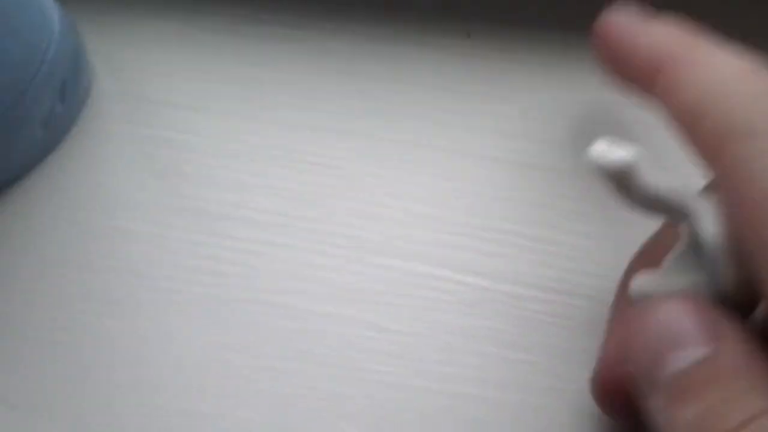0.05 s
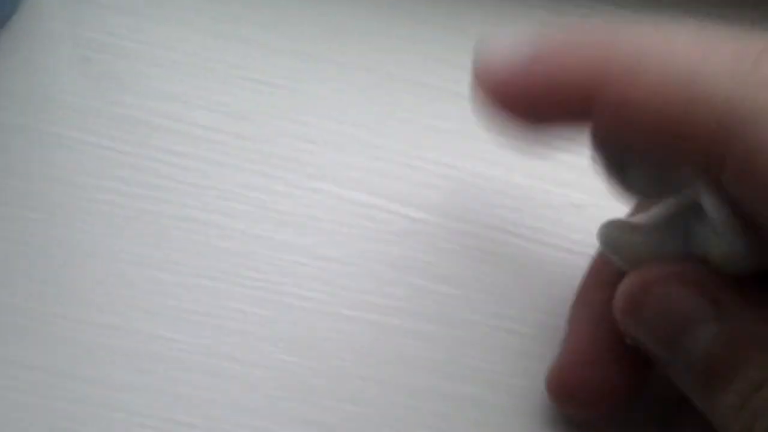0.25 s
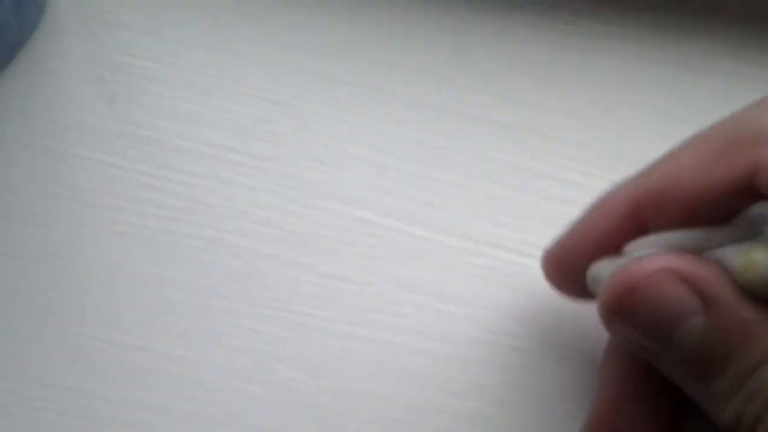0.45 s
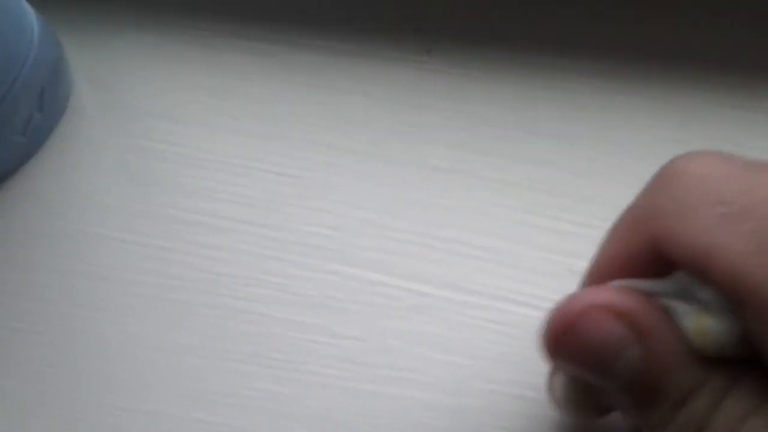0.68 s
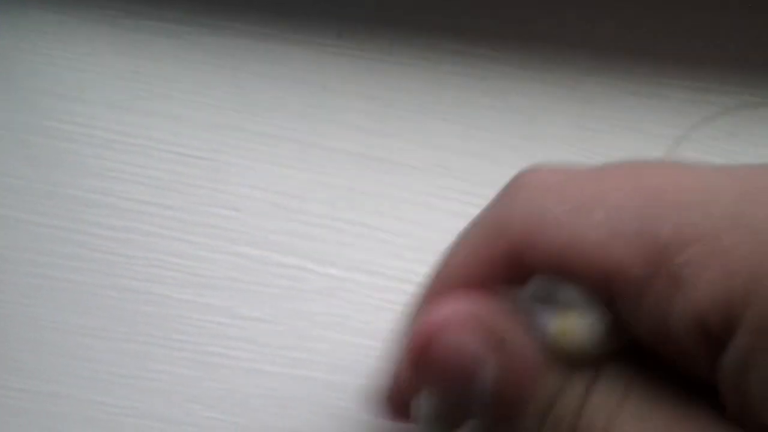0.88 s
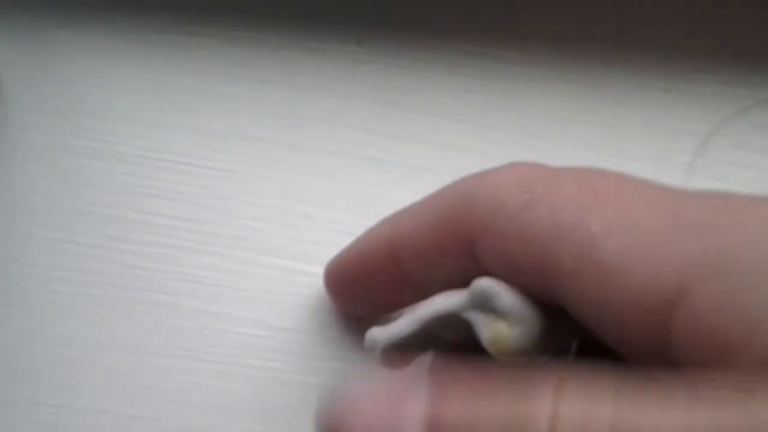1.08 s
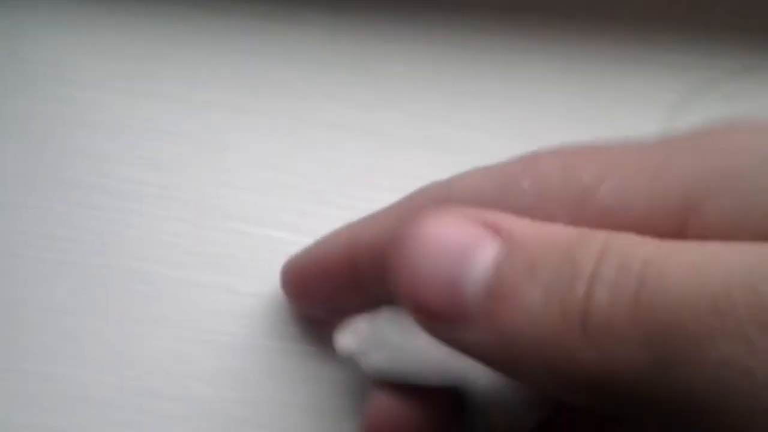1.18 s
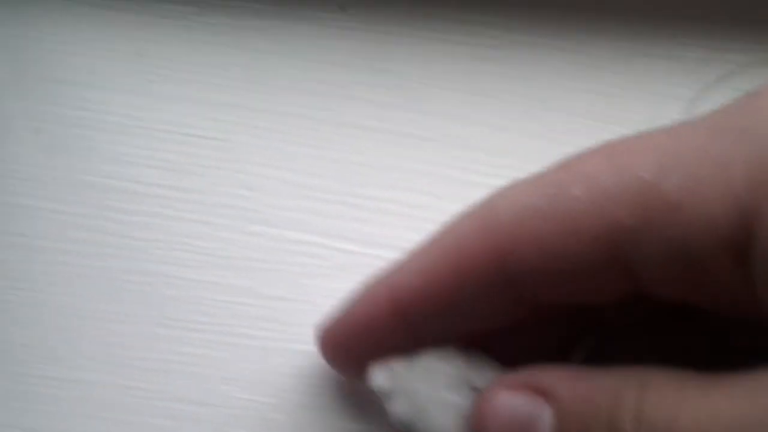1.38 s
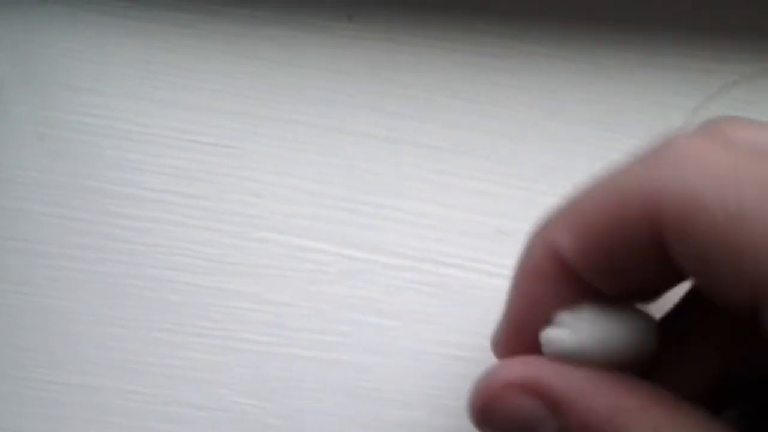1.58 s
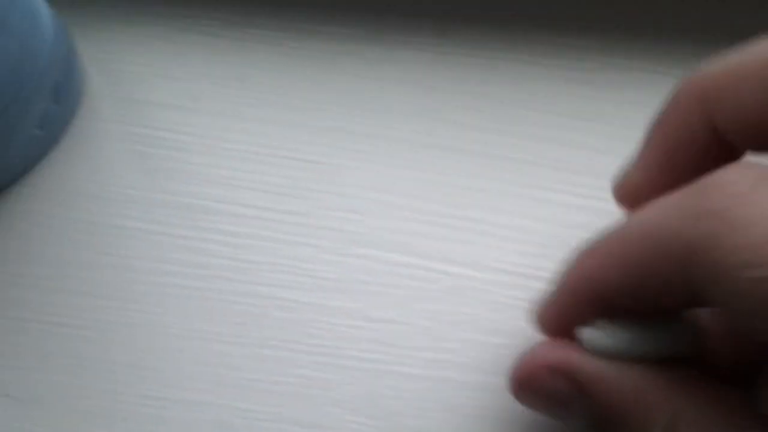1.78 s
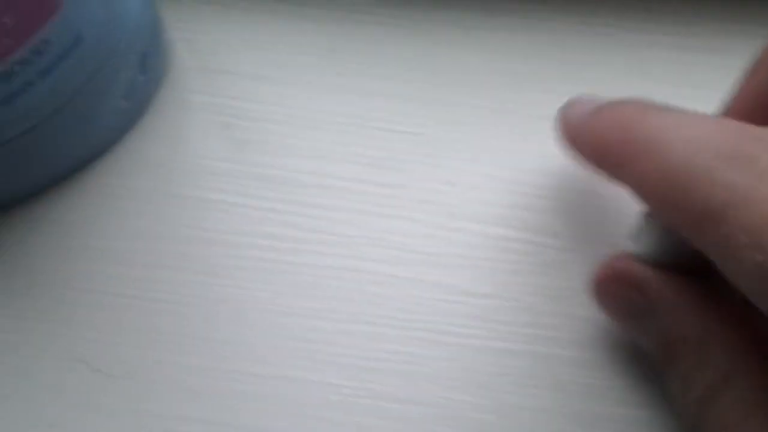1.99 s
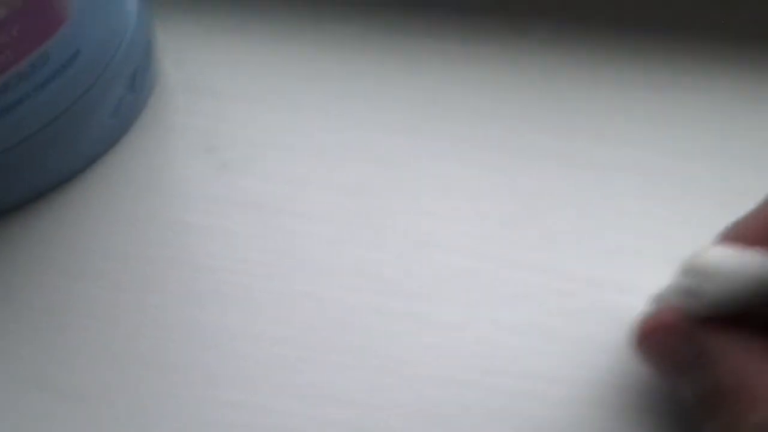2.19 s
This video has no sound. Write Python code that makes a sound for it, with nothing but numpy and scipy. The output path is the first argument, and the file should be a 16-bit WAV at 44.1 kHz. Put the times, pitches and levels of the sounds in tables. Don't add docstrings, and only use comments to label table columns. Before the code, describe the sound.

Slime squeezed close up: bright ticks, a hard overloading pop, then bursts of fine wet crackle

```python
import sys
import numpy as np
from scipy import signal
from scipy.fft import rfft, irfft
from scipy.io import wavfile
from scipy.ndimage import uniform_filter1d

SR = 44100
rng = np.random.default_rng(int(sys.argv[2]) if len(sys.argv) > 2 else 0)


def level_to_linear(level):
    exponent = np.asarray(level, float) / 20
    return 10 ** exponent


def store_pcm(level_fs):
    pcm = np.round(np.clip(level_fs, -1, 1) * 32767).astype(np.int16)
    wavfile.write(sys.argv[1], SR, np.atleast_2d(pcm).T)


N = 99225

# (frequency [Hz], density [dB per Hz])
FLOOR_COLOUR = [(15, -29), (25, 2.5), (253, -8), (537, -15), (762, -18.5), (3530, -23.5), (4620, -28),
                (13500, -24), (15500, -33.5)]
# (time [s], level [dB])
HISS_GAIN = [(0, 2), (.2, 5), (.33, -0.5), (.6, 2), (0.799, 0), (.84, -6.5), (.88, 0.5), (1.05, 2),
             (1.331, -1), (1.42, 3), (1.48, -2), (1.55, 3), (1.64, -2.5), (1.7, 6), (1.95, 2), (2.1, -1.5),
             (2.25, 2)]
# (time [s], level [dB])
RUB_EFFORT = [(0.0, -55), (0.14, -59.5), (0.32, -62), (0.69, -80), (0.97, -57.5), (1.06, -60), (1.35, -73),
              (1.58, -62), (1.81, -62), (1.979, -61.5), (2.25, -66.5)]
# (frequency [Hz], density [dB per Hz])
RUB_COLOUR = [(65, -38), (110, -3), (250, -2), (327, -8.5), (896, -14.5), (993, -16), (5040, -19.5),
              (13800, -30.5), (15000, -34)]
# (time [s], level [dB])
KNOCKS = [(.002, -45), (0.028, -44), (0.049, -51), (.075, -52.5), (0.227, -53), (0.56, -55), (.96, -65),
          (1.04, -49.5), (1.056, -60), (1.389, -55), (1.668, -54), (1.751, -67), (1.811, -58), (1.88, -57),
          (1.952, -55.5), (2.201, -53.5)]
# (frequency [Hz], level [dB], t60 [s])
TABLE_MODES = [
    (133.3, -3.5, 0.14),
    (203.3, -2, 0.12),
    (273, -6, 0.21),
    (374, -1.5, 0.05),
]
# (time [s], peak [dB], ring [Hz], edge click
# [dB])
TICKS = [(0.0199, -25.5, 4300, 3), (.0198, -22.5, 7420, -7), (0.0201, -29.5, 2310, -18),
         (0.0234, -34, 4400, -13), (0.0779, -33, 5700, -11), (0.113, -42, 5800, 0), (.158, -46, 5000, -1),
         (.1662, -42, 5500, -5), (.1831, -32, 7900, -1), (0.1836, -32, 4900, -10), (.187, -36, 7000, 0),
         (.1906, -34, 7200, -6), (0.194, -39, 5000, -2), (.197, -28.5, 5300, 0), (0.2033, -43, 6500, 0),
         (.2057, -35, 5000, 2), (0.216, -35, 3777, -10), (0.2182, -38, 4860, -6), (.2512, -34, 5070, -12),
         (0.2555, -35, 5300, -16), (.2888, -47, 5000, -9), (0.3921, -43, 4890, -1), (0.394, -41, 5250, -2),
         (0.3973, -42.5, 5000, -3), (0.4176, -45.5, 5600, -11), (0.573, -32.5, 5100, -14),
         (0.8959, -34, 5160, -17.5), (1.0536, -39.5, 4430, -6.5), (1.0707, -40.5, 5400, -3),
         (1.3876, -43, 4600, -14), (1.3932, -42, 5200, -9), (1.395, -44, 4300, -4), (1.3984, -37, 4500, -8),
         (1.6688, -43.5, 4900, -3), (1.6965, -41, 2920, -6), (1.7084, -45, 3200, -4),
         (1.9315, -36, 5140, -13), (1.9335, -31, 5240, -16), (1.9366, -46, 5200, -8),
         (1.165, -42.5, 7200, -12), (.9197, -37, 5130, -17), (.9404, -43, 5100, -10),
          (.9473, -40, 3060, -12), (.9574, -51, 4500, -7), (.9596, -43, 3900, -7), (.9623, -34, 4430, 5),
          (.9642, -33, 5400, -7), (.9705, -32, 4900, -3), (.9774, -31, 5100, -12), (.9811, -32, 5000, -11),
          (1.0048, -37, 4630, -6), (1.0102, -41, 5500, -5), (1.0235, -34, 4400, -14),
          (1.0273, -37, 5200, -9), (1.0312, -38, 5240, -3), (1.0338, -33, 6300, -13),
          (1.0352, -30, 5260, -11), (1.0366, -27.5, 5300, -9), (1.7456, -39, 5100, -10),
          (1.7494, -40, 7600, -1), (1.752, -28.5, 4400, -12), (1.7566, -34, 4600, -10),
          (1.7585, -32, 4900, -10), (1.7624, -34, 4700, -13), (1.7649, -35, 5300, -6),
          (1.7665, -35.5, 3930, -5), (1.8461, -39, 4730, -7), (1.8484, -33, 4840, -4),
          (1.8543, -33, 4830, -10), (1.8572, -32, 5300, -12), (1.8638, -33.5, 5070, 4),
          (1.8674, -28.5, 5160, -4), (1.8721, -36, 4900, 6), (1.8737, -42, 5100, 4)]
# (frequency [Hz], density [dB per Hz])
RIM_COLOUR = [(2000, -10.5), (5000, 1), (6200, -2.5), (7700, 2), (9500, -2), (11500, -2), (14500, -1.5)]
# (frequency [Hz], density [dB per Hz])
FIZZ_COLOUR = [(290, -37), (500, -10.5), (2330, -6), (2610, -17.5), (4870, -3), (6390, -17), (9650, -11.5),
               (14000, -25), (15000, -37.5)]
# (time [s], peak [dB], ring [Hz])
POPS = [(.0213, -29.5, 2840), (.1833, -35.5, 1070), (.1835, -37.5, 1870), (.896, -37, 3500),
        (1.0372, -38, 510), (1.232, -38.5, 1410), (1.481, -46, 5200), (1.522, -40, 4760),
        (1.362, -46.5, 4600), (1.233, -43.5, 4000), (1.673, -44, 2280), (.274, -45, 2300),
        (.297, -51, 2400), (1.669, -37.5, 2160), (1.670, -40, 660), (0.22, -40.5, 360), (1.9234, -33, 1650),
        (1.932, -39.5, 1960), (2.012, -48, 1590), (2.1553, -40.5, 2950), (2.156, -47.5, 1600)]
# (start [s], length [s], level [dB], brightness [dB per octave])
SQUEEZES = [(0.057, 0.07, -60, -10), (0.136, 0.034, -58.5, -6), (0.178, 0.055, -54.5, 2),
            (0.23, 0.035, -57, 3), (0.247, 0.057, -69, -13.5), (0.382, 0.021, -57.5, 5),
            (0.406, 0.013, -58.5, -7.5), (0.55, 0.11, -66, -8), (0.698, 0.087, -67.5, -6),
            (0.888, 0.034, -55.5, -2.5), (0.921, 0.051, -53, 0.5), (0.951, 0.038, -48, 2),
            (0.991, 0.024, -48, 1), (1.014, 0.019, -46, -5.5), (1.03, 0.026, -62, 8),
            (1.145, 0.051, -62.5, 9), (1.222, 0.019, -62.5, 4), (1.308, 0.09, -69.5, 2.5),
            (1.369, 0.058, -63.5, 1), (1.384, 0.019, -58.5, -2), (1.492, 0.12, -61.5, -3.5),
            (1.658, 0.083, -56.5, -7.5), (1.739, 0.034, -49, -2), (1.769, 0.11, -61, -1.5),
            (1.827, 0.034, -51, -1), (1.859, 0.026, -60, -3), (1.864, 0.091, -55.5, -3),
            (1.957, 0.13, -66.5, -3), (2.1, .15, -69.5, -10.5)]
# (frequency [Hz], width [Hz], level [dB])
CELLS = [
    (1500, 1800, -14),
    (2890, 1600, -12),
    (3900, 990, -6),
    (4947, 970, -0.35),
    (5600, 740, -11.5),
    (7200, 2000, -9),
    (9700, 1900, -8.5),
    (12500, 3000, -16.5),
]
# (frequency [Hz], level [dB], t60 [s])
BURST_MODES = [
    (260, -23, .012),
    (1700, -3.5, .0017),
    (3420, 4.5, .0028),
    (4940, .5, .0029),
    (6800, 4.5, .0013),
    (8850, -7, .003),
    (14250, -7, .0017),
]
# (frequency [Hz], level [dB], t60 [s])
AFTER_RING = [
    (224, -71, 0.062),
    (2660, -28, 0.019),
    (2870, -20.5, 0.013),
    (4300, -10.5, 0.0042),
    (5300, -32.5, 0.012),
    (7600, -30.5, 0.00504),
]

WALL_HZ = 4940
PATCHY_DB = .9


def level(x, db):
    return x * level_to_linear(db) / np.sqrt(np.mean(x ** 2))


def fade(t, t60):
    return np.exp(-np.log(1000) * t / t60)


def colour(x, points):
    hz, db = np.array(points, float).T
    bins_hz = np.arange(1025) * SR / 2048
    log_gain = np.interp(np.log(bins_hz + 1), np.log(hz), db) * np.log(10) / 20
    cepstrum = irfft(log_gain)
    cepstrum[1:1024] *= 2
    cepstrum[1025:] = 0
    response = irfft(np.exp(rfft(cepstrum)))
    return signal.fftconvolve(x, response)[:len(x)]


def filtered(x, order, hz, kind):
    return signal.sosfilt(signal.butter(order, hz, kind, fs=SR, output="sos"), x)


def add(out, s, sound):
    i = max(int(s * SR), 0)
    out[i:i + len(sound)] += sound[:N - i]


def grains(rate, scatter_db):
    chance, sign, size = rng.random((3, N))
    sizes = level_to_linear(-scatter_db * np.log(size + 1e-4))
    return level((chance < rate / SR) * np.sign(sign - .5) * sizes, 0)


def walk(rate):
    k = int(SR / rate)
    steps = np.repeat(rng.standard_normal(N // k + 1), k)
    return 1.8 * uniform_filter1d(uniform_filter1d(steps, k), k)[:N]


def room_floor(near):
    floor_db, flicker_db = -61.5, .6
    duck_db, duck_at_db, duck_s, rumble_hz = -9, -51.5, .03, 120
    noise = level(colour(rng.standard_normal(N), FLOOR_COLOUR), floor_db)
    gain_db = np.interp(np.arange(N) / SR, *np.array(HISS_GAIN).T)
    noise = noise * level_to_linear(flicker_db * walk(23) + gain_db)
    loud = uniform_filter1d(np.minimum(np.abs(near) / level_to_linear(duck_at_db), 1), int(duck_s * SR))
    rumble = signal.sosfiltfilt(signal.butter(2, rumble_hz, fs=SR, output="sos"), noise)
    return noise - (1 - level_to_linear(duck_db * loud)) * rumble


def rub(t):
    effort_db = np.interp(t, *np.array(RUB_EFFORT).T) + 0.5
    slips = level(colour(grains(rate=3600, scatter_db=1.5), RUB_COLOUR), 0)
    return level_to_linear(effort_db + PATCHY_DB * walk(36)) * slips


def table(t):
    rise_s, strength_scatter_db, pitch_scatter = 0.0049, 0.83, 0.0088
    hum_hz, hum_db, hum_start_s, hum_end_s = 209, -66, .27, .66
    out, u = np.zeros(N), np.arange(8192) / SR
    for (s, db), chances in zip(KNOCKS, rng.standard_normal((len(KNOCKS), 4))):
        ring = 0
        for (hz, mode_db, t60), c in zip(TABLE_MODES, chances):
            tone = np.sin(2 * np.pi * hz * (1 + pitch_scatter * c) * u)
            ring = ring + level_to_linear(mode_db + strength_scatter_db * c) * tone * fade(u, t60)
        add(out, s, level_to_linear(db) * np.clip(u / rise_s, 0, 1) * ring)
    swell = np.clip((t - hum_start_s) / .05, 0, 1) * np.clip((hum_end_s - t) / .1, 0, 1)
    hum_level = level_to_linear(hum_db + walk(15)) * swell
    turns = np.cumsum(hum_hz * (1 + .008 * walk(8))) / SR
    return out + hum_level * np.sin(2 * np.pi * turns)


def ticks():
    ring_cycles, rise_s = 14, 0.000091
    fizz_edge_db, fizz_tail_db, fizz_tail_t60 = -10, -21.5, .014
    out, t = np.zeros(N), np.arange(1024) / SR
    click = colour(1. * (t == 3 / SR), RIM_COLOUR)
    snaps = TICKS
    for (s, db, hz, edge_db), noise in zip(snaps, rng.standard_normal((len(snaps), 1024))):
        ring = np.sin(2 * np.pi * hz * t) * fade(t, ring_cycles / hz)
        edge = level_to_linear(fizz_edge_db + edge_db) * fade(t, .003)
        tail = level_to_linear(fizz_tail_db) * fade(t, fizz_tail_t60)
        fizz = level(colour(noise, FIZZ_COLOUR), 0) * (edge + tail)
        rise = 1 - np.exp(-t / rise_s)
        add(out, s, level_to_linear(db) * ((ring + fizz) * rise + level_to_linear(edge_db) * click))
    return filtered(out, 2, 2200, "high")


def pops():
    ring_cycles, glide = 18, .15
    out, t = np.zeros(N), np.arange(2048) / SR
    for s, db, hz in POPS:
        turns = hz * t
        rise = 1 - np.exp(-turns / 0.59)
        tone = np.sin(2 * np.pi * turns * (1 + glide * turns / ring_cycles))
        decay = fade(turns, ring_cycles * (hz / WALL_HZ) ** 0.38)
        add(out, s, level_to_linear(db) * rise * tone * decay)
    return out


def crackle(t):
    attack_s, release_s = .012, 0.0043
    force = []
    for s, length, db, _ in SQUEEZES:
        press = np.clip((t - s) / attack_s, 0, 1)
        let_go = np.exp(-np.maximum(t - s - length, 0) / release_s)
        force.append(level_to_linear(db) * press * let_go)
    force = np.array(force)
    tilt = np.array(SQUEEZES)[:, 3]
    out = 0
    for hz, width, db in CELLS:
        tears = grains(rate=5000, scatter_db=2.0)
        cells = level(filtered(tears, 2, [hz - width / 2, hz + width / 2], "band"), db - 5.5)
        push = level_to_linear(tilt * np.log2(hz / WALL_HZ)) @ force
        out = out + push * level_to_linear(PATCHY_DB * walk(120)) * cells
    return out * level_to_linear(PATCHY_DB * walk(250))


def burst():
    start_s, rise_s = .23175, .0002
    out, t = np.zeros(N), np.arange(4096) / SR
    ring = 0
    for hz, db, t60 in BURST_MODES + AFTER_RING:
        direction = -1 if hz == WALL_HZ else 1
        ring = ring + direction * level_to_linear(db) * np.sin(2 * np.pi * hz * t) * fade(t, t60)
    add(out, start_s, ring * (1 - np.exp(-(t / rise_s) ** 2)))
    return out


def room_tail(near):
    room_db, t60, centre_hz, half_width_hz = -49.5, 0.18, 2560, 280
    u = np.arange(16384) / SR
    band = [centre_hz - half_width_hz, centre_hz + half_width_hz]
    echo = filtered(rng.standard_normal(len(u)), 1, band, "band")
    echo = echo * fade(u, t60) * (u > .004)
    return level_to_linear(room_db) * signal.fftconvolve(near, echo)[:N]


def scene():
    t = np.arange(N) / SR
    near = ticks() + pops() + burst() + crackle(t)
    mono = near + room_tail(near) + rub(t) + table(t) + room_floor(near)
    side = level_to_linear(-38.5) * np.roll(mono, 40)
    return mono + side * np.array([[1], [-1]])


def band_limit(x):
    return signal.sosfilt(signal.butter(12, 16700, fs=SR, output="sos"), x)


def record(dry):
    thinned = filtered(dry, 1, 78, "high")
    top_cut = signal.ellip(8, .1, 35, 14650, fs=SR, output="sos")
    heard = signal.sosfiltfilt(top_cut, thinned)
    return band_limit(np.clip(heard, -1.02, 1.02))


dry = scene()
out = record(dry)
store_pcm(out)
```